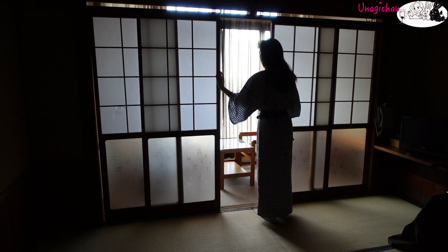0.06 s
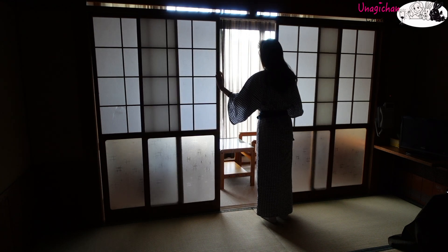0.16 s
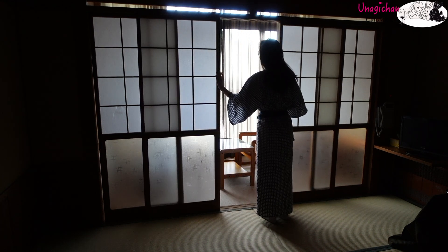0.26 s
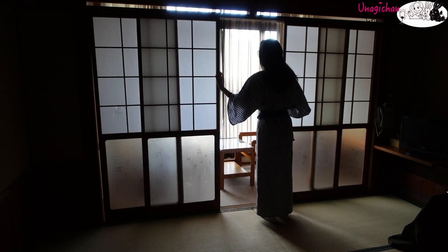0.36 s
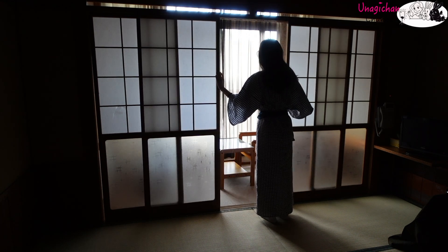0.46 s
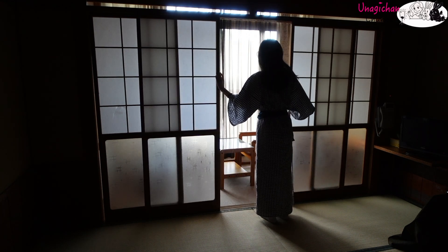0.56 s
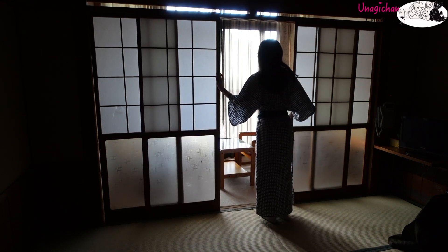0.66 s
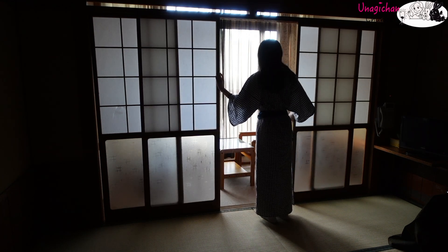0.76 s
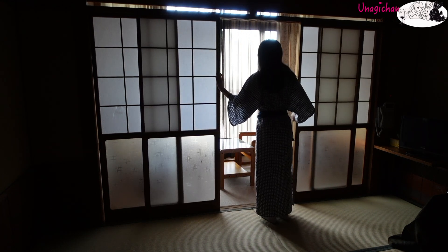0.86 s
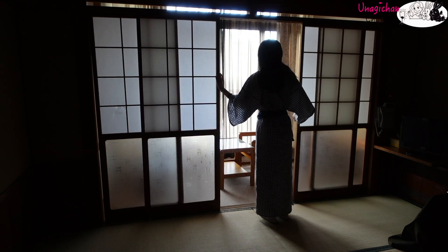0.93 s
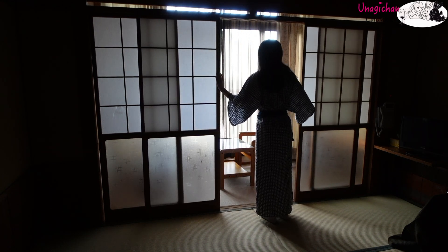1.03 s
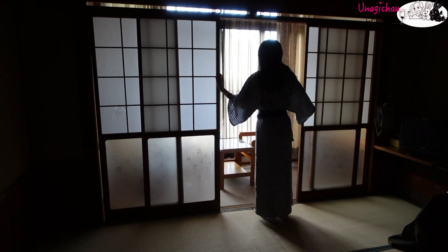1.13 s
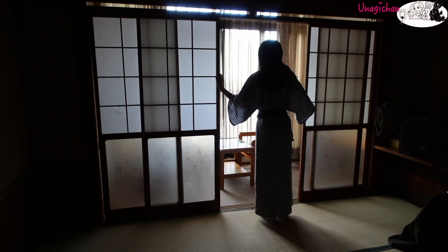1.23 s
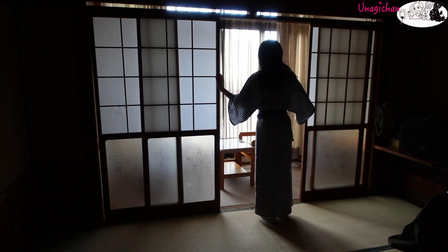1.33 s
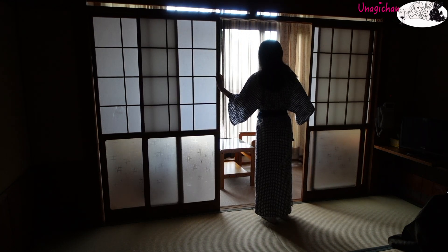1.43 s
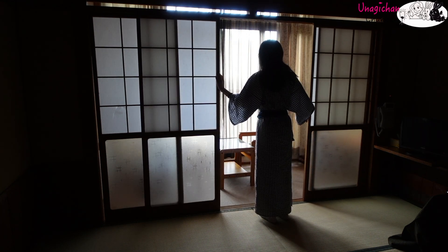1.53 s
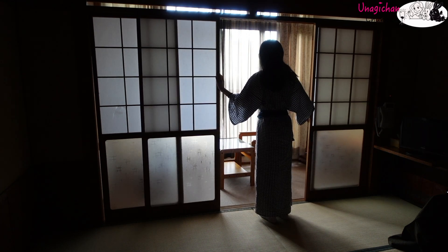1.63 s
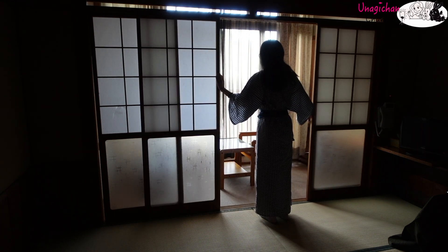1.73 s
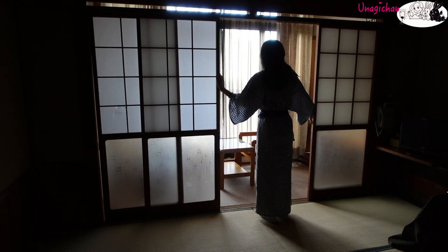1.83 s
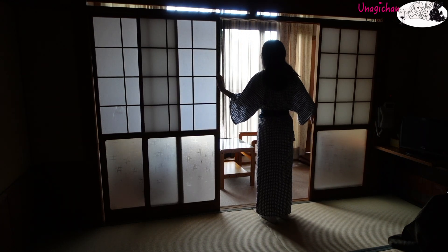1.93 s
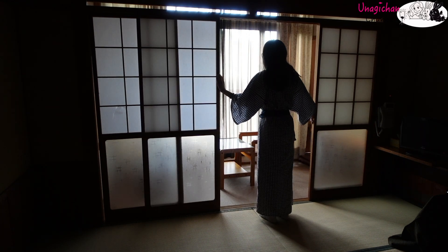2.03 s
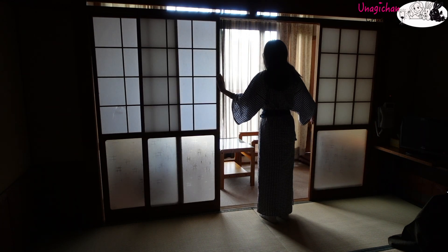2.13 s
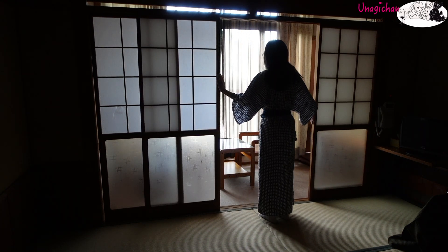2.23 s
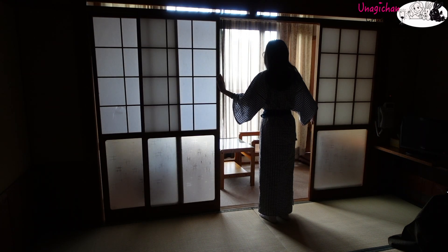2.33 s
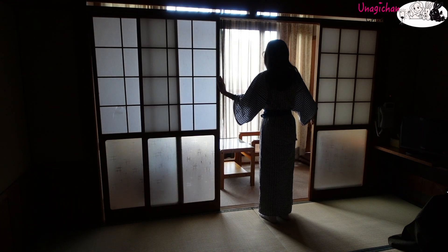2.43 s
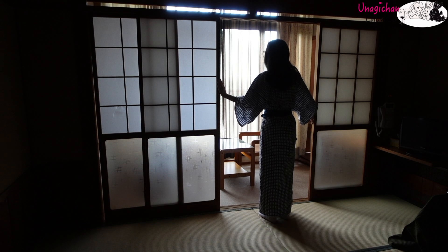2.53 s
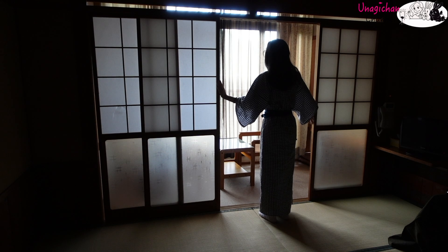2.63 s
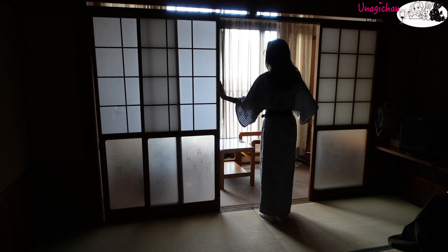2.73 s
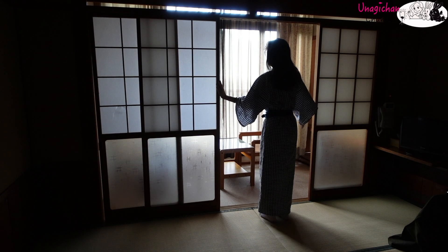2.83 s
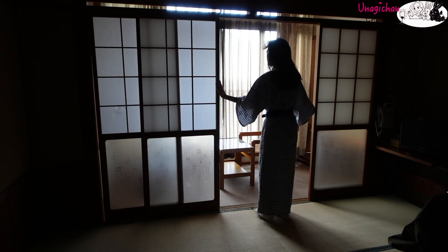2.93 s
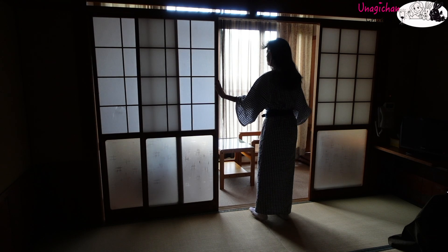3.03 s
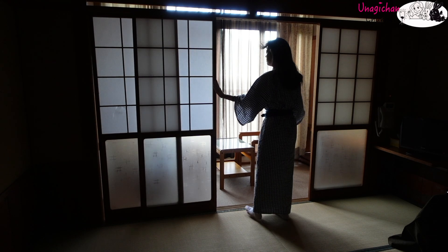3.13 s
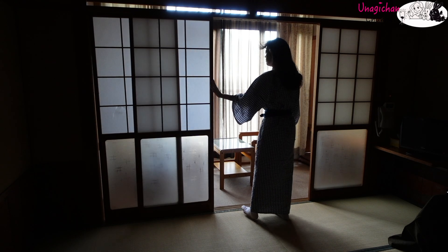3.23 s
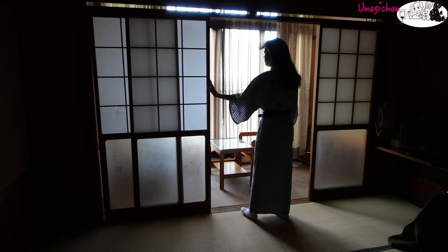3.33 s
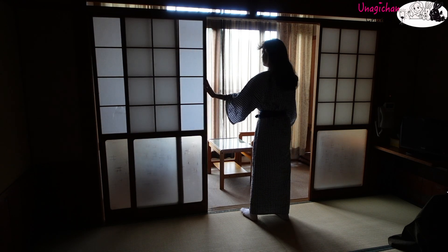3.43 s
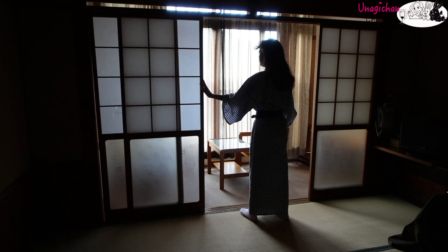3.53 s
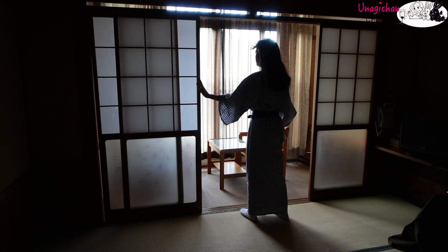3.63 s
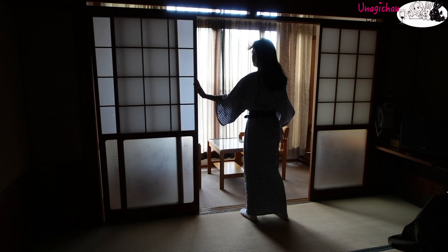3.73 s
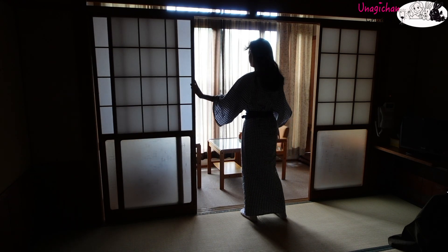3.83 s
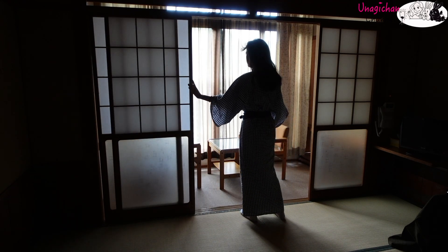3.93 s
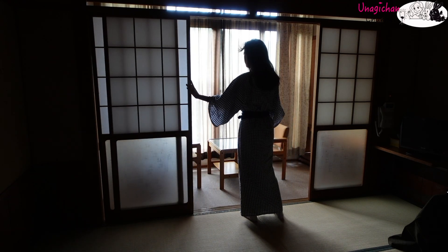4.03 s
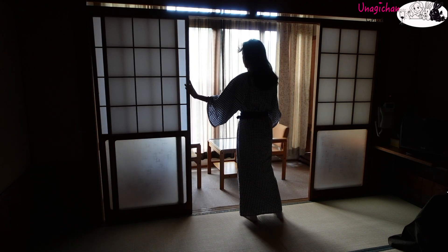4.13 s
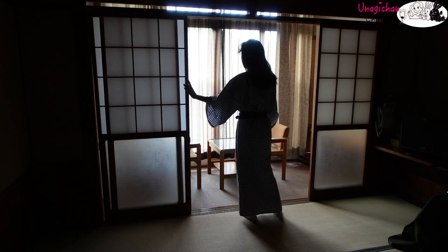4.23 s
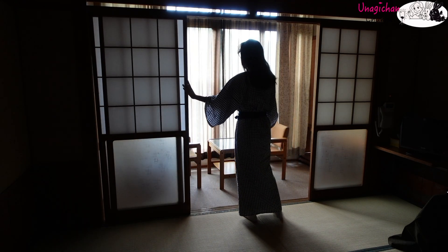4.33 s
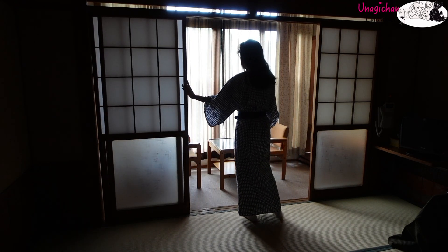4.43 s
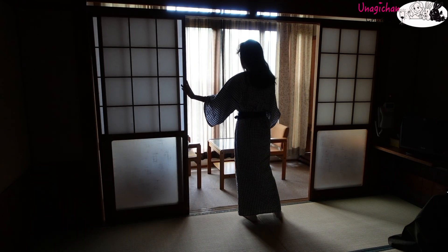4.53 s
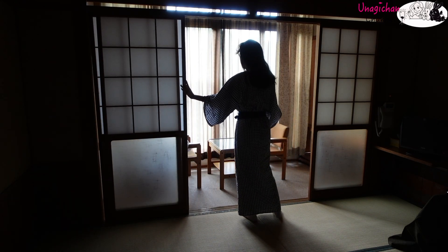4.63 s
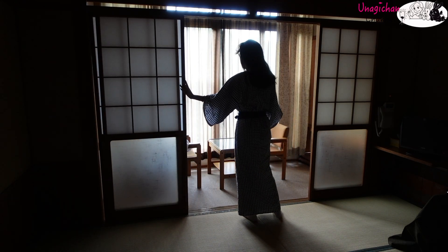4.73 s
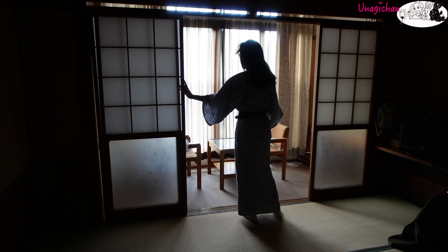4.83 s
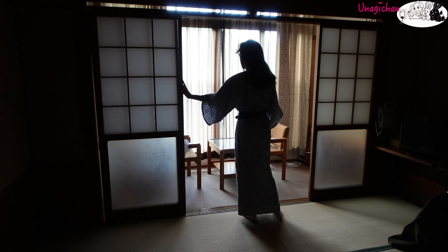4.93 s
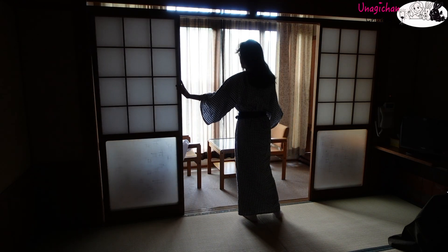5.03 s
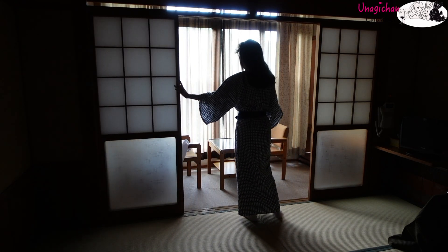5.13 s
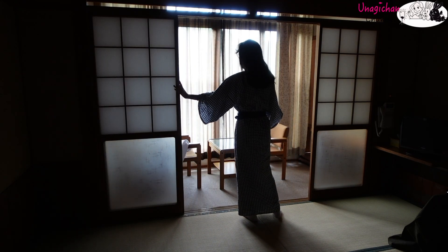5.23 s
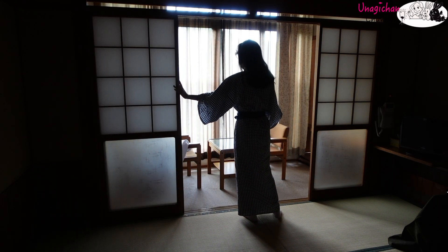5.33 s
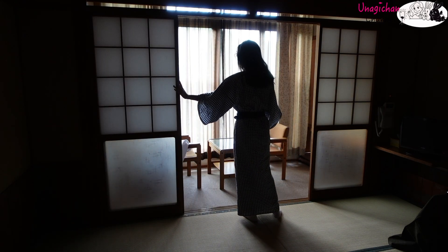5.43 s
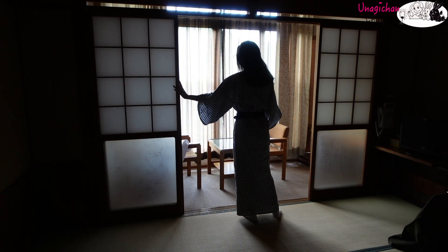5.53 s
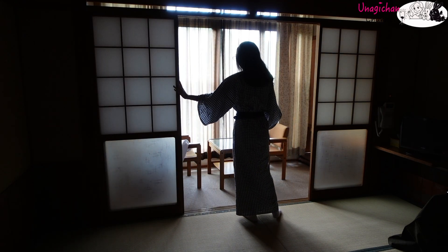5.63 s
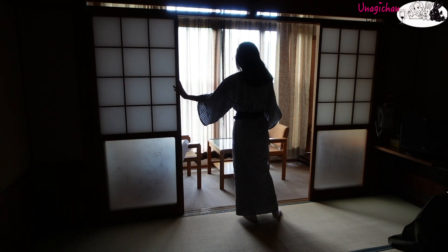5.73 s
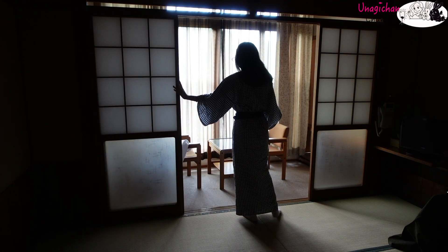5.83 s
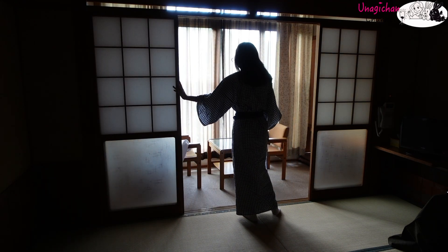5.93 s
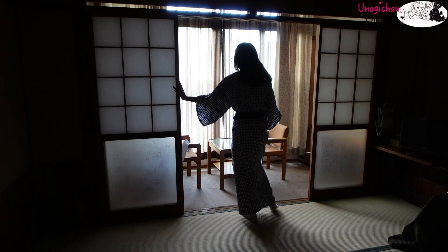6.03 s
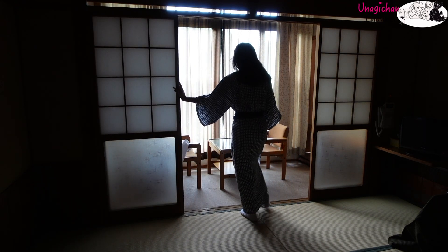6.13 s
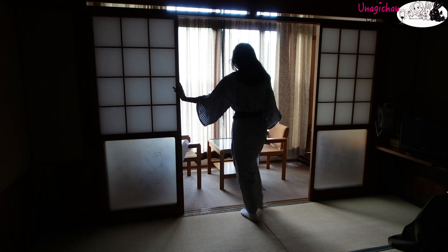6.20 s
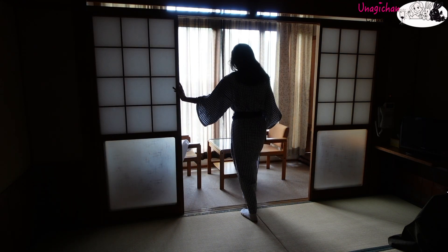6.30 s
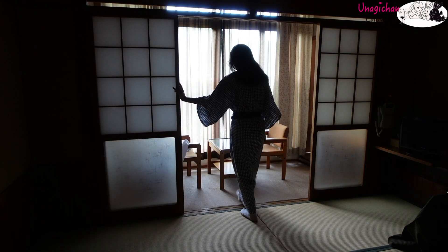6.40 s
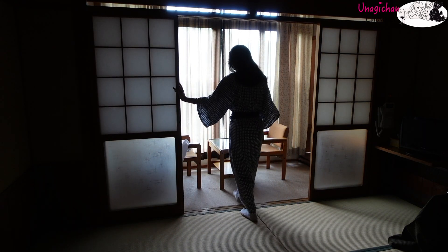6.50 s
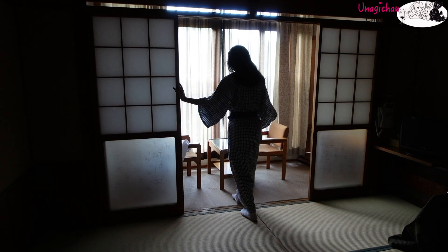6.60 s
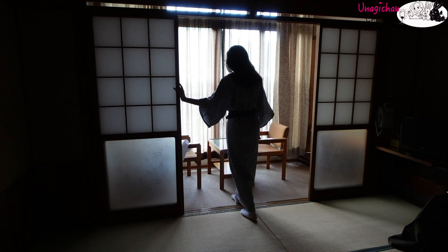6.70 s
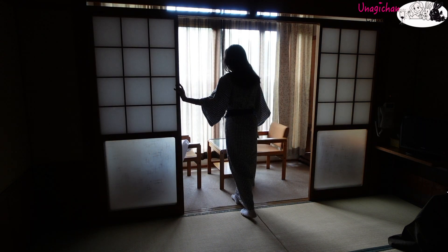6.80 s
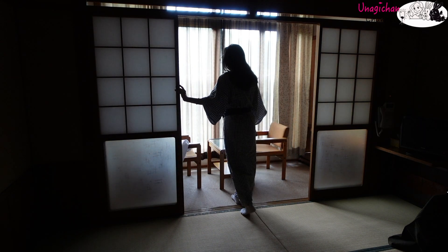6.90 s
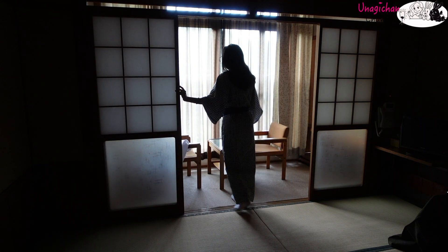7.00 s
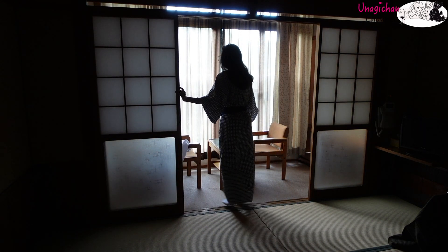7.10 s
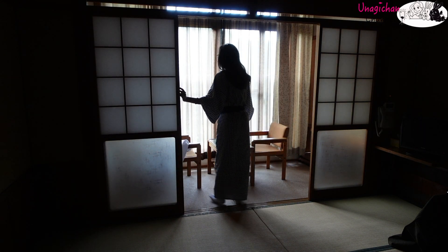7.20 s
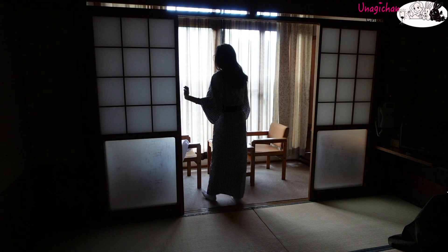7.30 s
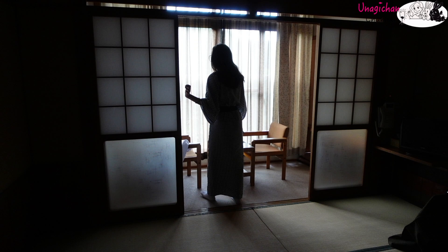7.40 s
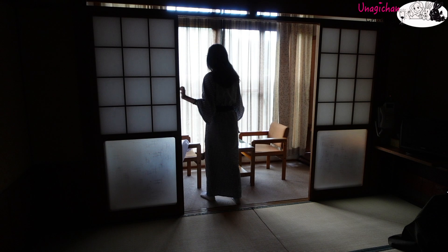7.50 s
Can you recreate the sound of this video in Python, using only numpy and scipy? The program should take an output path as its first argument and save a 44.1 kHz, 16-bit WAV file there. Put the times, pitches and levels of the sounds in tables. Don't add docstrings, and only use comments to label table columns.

```python
import sys
import numpy as np
from scipy import signal
from scipy.fft import rfft, irfft
from scipy.io import wavfile
from scipy.ndimage import uniform_filter1d

SR = 44100
rng = np.random.default_rng(int(sys.argv[2]) if len(sys.argv) > 2 else 0)


def elevation(decibels):
    levels = np.asarray(decibels, float)
    return 10 ** (levels / 20)


def inscribe(sig):
    pcm = np.round(np.clip(np.atleast_2d(sig).T, -1, 1) * 32767)
    wavfile.write(sys.argv[1], SR, pcm.astype(np.int16))


N = 333396
TIME = np.arange(N) / SR


def unit(x):
    return x / np.sqrt(np.mean(x ** 2))


def colour(x, points, peaks=()):
    hz = np.arange(len(x) // 2 + 1) * SR / len(x) + 1
    f, db = np.transpose(points)
    gain = elevation(np.interp(np.log(hz), np.log(f), db, left=-60, right=-60))
    for centre_hz, width_hz, up_db in peaks:
        gain = gain * elevation(up_db / (1 + (2 * (hz - centre_hz) / width_hz) ** 2))
    return unit(irfft(rfft(x) * gain, len(x)))


def ring(x, modes, damp):
    out = 0
    for k, (hz, db, t60) in enumerate(modes):
        radius = np.exp(-np.log(1000) / (t60 * damp * SR))
        w = 2 * np.pi * hz / SR
        note = signal.lfilter([0, np.sin(w)], [1, -2 * radius * np.cos(w), radius ** 2], x)
        out = out + (-1) ** k * elevation(db) * note
    return out


def walk(rate_hz):
    hold = int(SR / rate_hz)
    steps = np.repeat(rng.standard_normal(N // hold + 1), hold)
    return unit(uniform_filter1d(uniform_filter1d(steps, hold), hold)[:N])


def bell(t, length_s):
    return np.exp(-(2 * t / length_s) ** 2)


def swells(rows):
    return sum(elevation(db) * bell(TIME - s, length) for s, length, db in rows)


def ports(mid, side, side_db, pan_db):
    both = mid + elevation(side_db) * side * np.array([[1], [-1]])
    return both * elevation(np.array([[pan_db], [-pan_db]]) / 2)


# (f/Hz, t60/s)
ROOM_DECAY = [(60, 1), (150, 0.91), (300, 0.7), (600, 0.53), (1200, 0.45), (2400, 0.34), (4800, 0.23),
              (9600, 0.35)]


def reflections(build_s):
    t = np.arange(SR) / SR
    octave = np.log2(np.arange(SR // 2 + 1) + 1.)
    centres = np.log2([hz for hz, _ in ROOM_DECAY])
    noise = rfft(rng.standard_normal((2, SR)))
    echo = 0
    for k, (_, t60) in enumerate(ROOM_DECAY):
        fade = (1 - np.exp(-t / build_s)) * elevation(-60 * t / t60)
        band = np.interp(octave, centres, np.arange(len(centres)) == k)
        echo = echo + irfft(noise * band, SR) * fade / np.linalg.norm(fade)
    return echo


def room(x, wet_db, side_db, pan_db, build_s=0.0019):
    near, apart = signal.fftconvolve(x[None], reflections(build_s), axes=1)[:, :N]
    mid = (x + elevation(wet_db) * near) / np.sqrt(1 + elevation(2 * wet_db))
    return ports(mid, apart, side_db, pan_db)


# (f/Hz, level/dB per Hz)
MURMUR = [(15, -69), (25, -30), (49, -21.5), (185, -3.5), (242, -5.5), (270, -3), (451, -8), (591, -4),
          (1020, -11.5), (1130, -6), (1330, -8.5), (1840, -8.5), (2350, -12.5), (3080, -14.5), (16000, -23)]


def quiet():
    hums = [(618, 35, 4.8), (1860, 120, 3.1)]  # (f/Hz, width/Hz, level/dB)
    mid, side = (colour(rng.standard_normal(N), MURMUR, hums) for _ in range(2))
    low = signal.lfilter(*signal.butter(1, 2000, fs=SR), mid)
    mid = mid + low * (elevation(.7 * walk(1.5) + .8 * walk(10)) - 1)
    side = signal.lfilter(*signal.butter(1, 11000, fs=SR), side)
    return elevation(-65) * ports(mid, side, -3.5, -1.2)


# (t/s, level/dB, length/s, f/Hz)
FLOOR_TREADS = [(0.054, -59, 0.058, 71.4), (.2, -49, 0.033, 72), (0.34, -55, 0.045, 70),
                (1.14, -60, 0.086, 74), (1.223, -60, .04, 72), (1.314, -66, 0.069, 72),
                (0.552, -70, 0.15, 70), (0.908, -70, 0.14, 72), (1.445, -75.5, 0.083, 68.4),
                (4.4, -80, .1, 65), (1.772, -69, 0.088, 70), (2.58, -62, .05, 68),
                (3.005, -75.5, 0.074, 62), (5.3, -50, .04, 72), (5.595, -64, .05, 75), (5.996, -76, .1, 55),
                (7.081, -64, 0.042, 59.4), (7.135, -67, .04, 62), (7.309, -64, .04, 70)]


def treads():
    out = 0
    for s, db, length, hz in FLOOR_TREADS:
        out = out + elevation(db) * np.sin(2 * np.pi * hz * (TIME - s)) * bell(TIME - s, length)
    return out


# (t/s, length/s, centre
# f/Hz, width/Hz, level/dB)
BRIEF_NOISES = [(2.6, .14, 5500, 1500, -77), (2.62, .16, 9000, 3000, -75), (5.735, .014, 4300, 900, -68),
                (5.765, .025, 4400, 900, -68), (5.82, .02, 4900, 700, -72), (6.61, .025, 4000, 2000, -66),
                (6.97, .04, 640, 90, -65), (3.71, .05, 5200, 1800, -58), (2.96, .01, 12000, 7000, -68),
                (3.006, .008, 12000, 7000, -67), (3.13, .2, 9800, 500, -74), (1.27, .01, 8000, 6000, -60),
                (7.335, .05, 3800, 1200, -67), (7.385, .11, 5500, 5000, -61),
                (.14, 0.1, 180, 27, -49), (.31, 0.11, 150.6, 8.3, -48), (0.523, 0.1, 4100, 230, -50),
                (2.95, 0.3, 9100, 9600, -67), (3.116, .14, 3200, 460, -57), (3.295, 0.21, 3100, 180, -53.5),
                (3.699, 0.73, 2946, 160, -53), (3.84, 0.36, 1404, 170, -54.5),
                (4.548, 0.53, 1780, 510, -66.5), (.07, 0.14, 155, 14, -52), (4.38, 0.25, 145, 21, -70.5),
                (5.53, 0.22, 149, 20, -53), (1.8, 0.37, 5700, 660, -58), (1.8, 0.36, 7340, 1700, -61.5),
                (5.318, 0.085, 284, 35, -38.5), (2.005, .008, 8100, 6600, -54),
                (1.5, .012, 5900, 5000, -56)]


def scuffs():
    out = np.zeros(N + SR)
    t = np.arange(SR) / SR - 1 / 2
    for s, length, centre_hz, width_hz, db in BRIEF_NOISES:
        peak = signal.iirpeak(centre_hz, centre_hz / width_hz, fs=SR)
        band = signal.filtfilt(*peak, rng.standard_normal(SR))
        swell = bell(t, length)
        at = int(s * SR)
        out[at:at + SR] += elevation(db) * unit(band * swell) * np.sqrt(np.mean(swell ** 2))
    return out[SR // 2:SR // 2 + N]


# (f/Hz, level/dB, t60/s)
FRAME_BOOM = [(68.6, -20, 1), (153, -7, 0.9), (192.3, -5, 0.91), (234, -0.5, 0.37), (297, -1.5, 0.45),
              (322.3, -2.5, 0.4), (400, -6, 0.17)]
# (f/Hz, level/dB, t60/s)
RIGHT_PANEL_NOTES = [(482, 5.5, 0.017), (627, 3.5, 0.028), (890, -17, 0.051), (1110, -10.5, 0.11),
                     (1460, -8, 0.02)]
# (f/Hz, level/dB, t60/s)
LATER_PANEL_NOTES = [(500, 0.5, 0.031), (592, 2, 0.02), (1210, -16, 0.18), (1620, -46, .04),
                     (1764, 4, 0.03), (1890, -3, 0.05), (3170, -7, 0.017)]
# (t/s, boom level/dB, wood level/dB, crack level/dB, brightness f/Hz)
HARD_KNOCKS = [(1.649, -86, -78, -49, 7000), (2.002, -50.5, -53.5, -44, 2500),
               (2.0066, -51, -53.5, -34.5, 4450), (2.012, -53, -51.5, -43, 2320),
               (2.017, -42.5, -48.5, -60, 930), (2.056, -58, -47.5, -49, 1800),
               (3.701, -69, -58.5, -38, 9500), (5.250, -69, -51, -26, 4850), (5.257, -36, -31.5, -23, 3530),
               (5.265, -51, -39, -37, 3500), (5.270, -38, -34.5, -27, 2180), (5.290, -59, -42.5, -41, 1210)]
# (t/s, boom level/dB, wood level/dB, time to full strength/s, brightness f/Hz)
SOFT_THUDS = [(2.488, -57.5, -50.5, .024, 400), (3.47, -63, -58.5, 0.013, 910), (5.721, -76, -74, .03, 500),
              (7.047, -72, -72, 0.027, 400), (7.282, -52, -57, 0.0046, 885), (7.331, -54, -61, 0.016, 600),
              (7.411, -65.5, -77, .0089, 500)]


def blows():
    out = np.zeros((2, N + SR))
    hard = [(*row, 0.00033 + 1 / row[4]) for row in HARD_KNOCKS]
    soft = [(s, boom, wood, wood - 20, hz, build) for s, boom, wood, build, hz in SOFT_THUDS]
    for s, boom_db, wood_db, crack_db, bright_hz, build_s in sorted(hard + soft):
        echo = reflections(build_s)
        echo[0, :88] += 0.01 * np.hanning(88)
        boom = ring(echo, FRAME_BOOM, 0.34)

        dull = signal.butter(3, [140, bright_hz], "band", fs=SR, output="sos")
        wood = signal.sosfilt(dull, echo)
        panel = RIGHT_PANEL_NOTES if s < 3 else LATER_PANEL_NOTES
        wood = elevation(41.5) * wood + elevation(9.5) * ring(wood, panel, 1.0)

        crack = rng.standard_normal((2, SR)) * np.exp(-np.arange(SR) / SR / 0.003)
        sharp = signal.butter(3, [1500, max(bright_hz, 5000)], "band", fs=SR, output="sos")
        crack = signal.sosfilt(sharp, crack)

        at = int(s * SR)
        out[:, at:at + SR] += elevation(boom_db + 4.5) * boom + elevation(wood_db) * wood + elevation(crack_db) * crack
    return ports(*out[:, :N], -12.5, -0.74)


def grit(spread_db, flutter_db):
    sizes = elevation(spread_db * np.minimum(rng.exponential(size=N), 5))
    return rng.standard_normal(N) * sizes * elevation(flutter_db * walk(45) + flutter_db * walk(9))


def rail_scrape(wood, rails, lean_db):
    scrape = colour(grit(3.0, 0.96), wood, rails)
    dull = signal.sosfiltfilt(signal.butter(2, 2200, fs=SR, output="sos"), scrape)
    return scrape + (elevation(lean_db) - 1) * dull


# (f/Hz, level/dB per Hz)
DUST_HISS = [(2650, -9), (4500, -2.5), (5140, -1.5), (6740, -8.5), (9720, -10), (12500, -21.5),
             (15200, -20), (16000, -26)]
# (from t/s, hiss level/dB above the scrape)
DUSTY_STRETCHES = [(0, -8), (.3, -5.5), (.47, -7.5), (.93, -8.5), (1.1, -11), (1.4, -13), (1.659, -10.5),
                   (1.83, -14.5), (2.8, -8), (3.06, -11.5), (3.3, -9), (3.76, -11), (3.96, -10), (4.2, -12)]


def dust_hiss(humps):
    since, dusty_db = np.transpose(DUSTY_STRETCHES)
    stretch = np.maximum(np.searchsorted(since, TIME, "right") - 1, 0)
    dust_db = uniform_filter1d(dusty_db[stretch], size=SR // 20)
    return elevation(dust_db) * colour(grit(1.8, 0.98), DUST_HISS, humps)


# (t/s, length/s, level/dB above the scrape)
RAIL_BUMPS = [
    (.2, 0.18, -30),
    (1.0, 0.13, -11.5),
    (1.2, 0.17, -15),
    (3.1, 0.12, -16),
    (3.58, 0.36, -19),
    (4.18, 0.25, -12.5),
    (4.41, 0.085, -13),
    (4.74, 0.065, -16),
    (5.07, 0.052, -22),
]


def frame_rumble(lean_db):
    shaking = elevation(-20 + 3 * lean_db) + swells(RAIL_BUMPS)
    return shaking * unit(ring(grit(1.7, 0.84), FRAME_BOOM[1:], 0.15))


# (f/Hz, level/dB per Hz)
WHINE_NOTES = [(4500, -19), (4880, -14), (4960, -3.5), (5040, -10), (5110, -1), (5190, -13), (5320, -15.5),
               (5800, -17)]
# (t/s, length/s, level/dB above the scrape)
WHINE_MOMENTS = [(0, 0.037, 0), (.3, 0.53, -14), (.9, .08, -8), (1.0, .06, -3), (1.65, .06, -7),
                 (1.81, 0.037, -8), (1.9, 0.23, -11), (2.98, 0.25, 1), (3.3, 0.13, 2), (3.72, 0.059, -4),
                 (4.02, 0.2, -6), (4.24, 0.16, -2.5), (4.4, .2, 2), (4.65, 0.36, 5.5), (4.97, 0.27, 2.5),
                 (5.2, 0.088, -2)]


def runner_whine():
    strength = elevation(-44) + swells(WHINE_MOMENTS)
    return strength * elevation(-5.5) * colour(grit(0.75, .6), WHINE_NOTES)


def door(pushes, wood, rails, humps, stop_s):
    s, effort_db, weight_db = np.transpose(pushes)
    scrape_db = np.interp(TIME, s, effort_db)
    lean_db = np.interp(TIME, s, weight_db)
    rubbing = rail_scrape(wood, rails, lean_db) + dust_hiss(humps)
    rubbing = rubbing + frame_rumble(lean_db) + runner_whine()
    moving = (TIME >= s[0]) & (TIME <= stop_s)
    return moving * elevation(scrape_db) * rubbing


# (f/Hz, level/dB per Hz)
LEFT_BODY = [(250, -58), (400, -16.5), (900, -12), (1500, -6), (2300, -6), (3200, -6), (4600, -13),
             (6000, -42), (8000, -60)]
# (f/Hz, width/Hz, level/dB)
LEFT_RAIL_NOTES = [(1150, 70, 6), (1440, 99, 4), (1800, 370, 2.5), (2300, 170, -3.5), (2720, 100, 6),
                   (2990, 87, 3.5), (3380, 80, 4.5), (3656, 67, 8.5), (4390, 110, 4), (4760, 48, 5)]
# (f/Hz, width/Hz, level/dB)
LEFT_DUST_HUMPS = [(5500, 150, -8), (5800, 91, 2), (8950, 500, -1), (9800, 700, 1.5), (11200, 2000, 3)]
# (t/s, scrape level/dB, leaning weight/dB)
LEFT_HAND_PULL = [
    (2.82, -80, 6),
    (2.98, -62.5, 1.5),
    (3.1, -53, -4.5),
    (3.28, -45.5, -4),
    (3.4, -47.5, -2),
    (3.76, -46.5, 0.5),
    (4.0, -49.5, -1),
    (4.26, -54.5, -4),
    (4.6, -62, -1.5),
]
# (t/s, scrape level/dB, leaning weight/dB)
LEFT_HAND_SHOVE = [
    (4.74, -61, -4),
    (4.86, -54.5, -4.5),
    (5.01, -51.5, -3.5),
    (5.14, -49, -3.5),
    (5.18, -55, 3.5),
    (5.24, -54.5, -3),
]


def left_door():
    pushes = LEFT_HAND_PULL + LEFT_HAND_SHOVE
    return room(door(pushes, LEFT_BODY, LEFT_RAIL_NOTES, LEFT_DUST_HUMPS, 5.25), -8, -12.0, 0.1)


# (f/Hz, level/dB per Hz)
RIGHT_BODY = [(250, -13.5), (400, -18.5), (700, -11), (950, -16), (1500, -10), (2400, -6.5), (3400, -4.5),
              (4300, -11), (6000, -37), (8000, -53)]
# (f/Hz, width/Hz, level/dB)
RIGHT_RAIL_NOTES = [(560, 85, 4), (654, 51, 5), (1646, 54, 7), (1960, 130, 6.5), (2874, 120, 5),
                    (3090, 180, 4), (3570, 180, -5), (3760, 165, 8.5), (1160, 220, 3.5)]
# (f/Hz, width/Hz, level/dB)
RIGHT_DUST_HUMPS = [(5850, 200, 2.5), (6750, 74, 5), (7960, 200, 1), (9450, 230, 1.5)]
# (t/s, scrape level/dB, leaning weight/dB)
RIGHT_HAND_PULL = [
    (0, -44.5, 5),
    (.14, -40.5, 1.5),
    (.32, -44.5, 5),
    (.48, -43.5, 1),
    (.9, -45.5, 1),
    (.97, -48, 1),
    (1.15, -50, -0.5),
    (1.58, -46, -2),
    (1.635, -47.5, -3),
]
# (t/s, scrape level/dB, leaning weight/dB)
RIGHT_HAND_SHOVE = [
    (1.65, -46, 1.07),
    (1.68, -45.5, 0),
    (1.724, -42, -1.1),
    (1.86, -46, -2.1),
    (1.985, -53, 1.2),
]


def right_door():
    pushes = RIGHT_HAND_PULL + RIGHT_HAND_SHOVE
    return room(door(pushes, RIGHT_BODY, RIGHT_RAIL_NOTES, RIGHT_DUST_HUMPS, 2.003), -7.5, -11.5, -1.05)


def scene():
    background = quiet() + treads() + room(scuffs(), -10, -15, -.6)
    return background + blows() + left_door() + right_door()


def top_cut(x):
    return signal.sosfilt(signal.butter(12, 15740, fs=SR, output="sos"), x)


def record(dry):
    mid, side = (dry[0] + dry[1]) / 2, (dry[0] - dry[1]) / 2
    side = side - .5 * signal.filtfilt(*signal.butter(2, 330, fs=SR), side)
    thin = signal.lfilter(*signal.butter(2, 45, "high", fs=SR), [mid + side, mid - side])
    return top_cut(thin)


dry = scene()
out = record(dry)
inscribe(out)
```